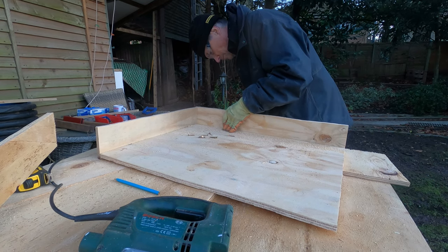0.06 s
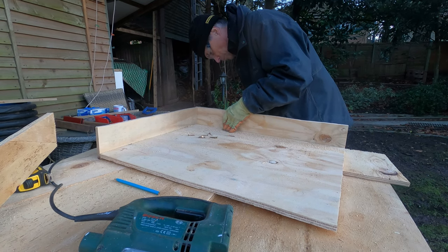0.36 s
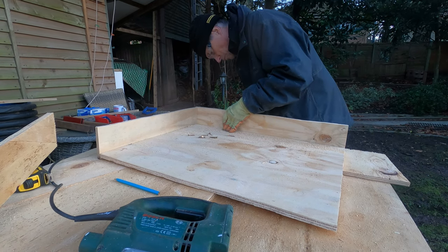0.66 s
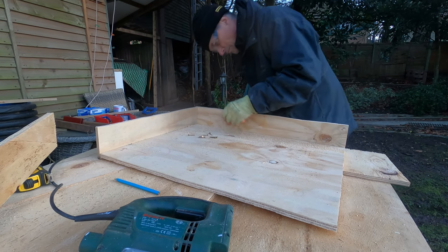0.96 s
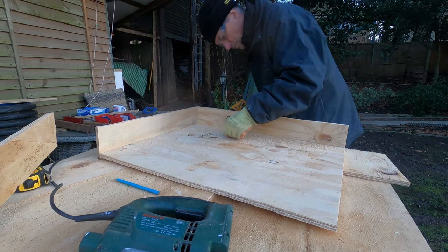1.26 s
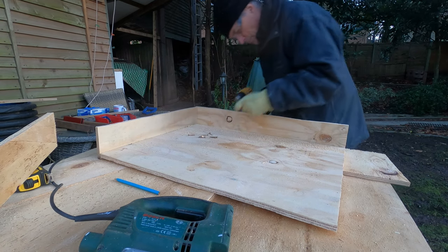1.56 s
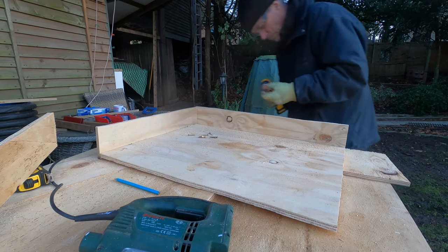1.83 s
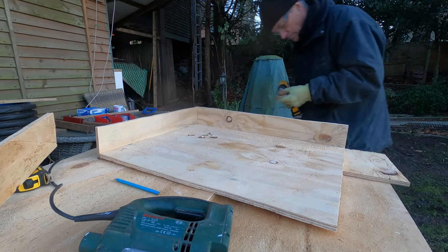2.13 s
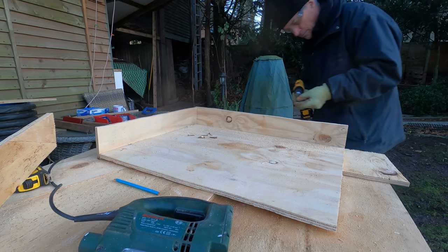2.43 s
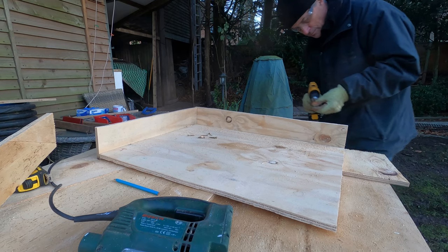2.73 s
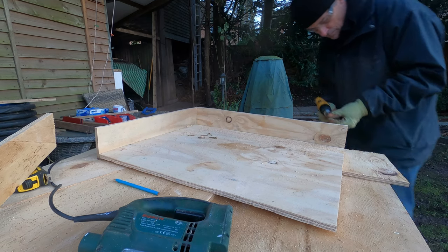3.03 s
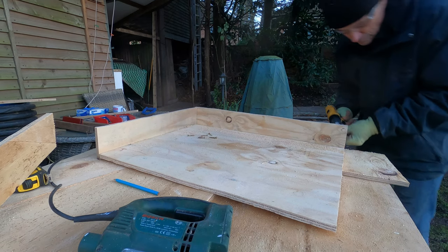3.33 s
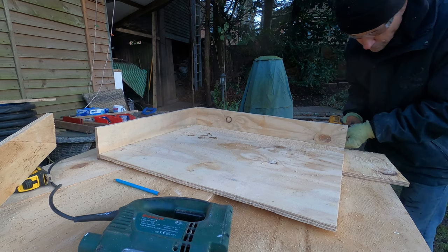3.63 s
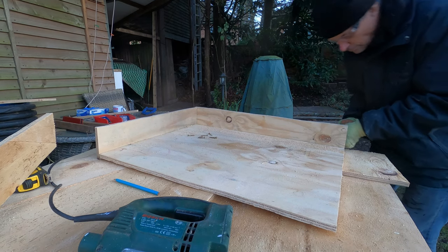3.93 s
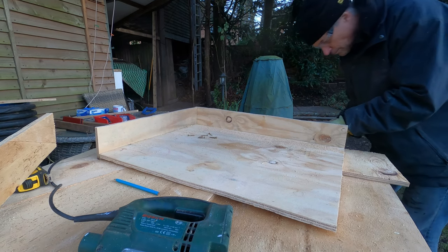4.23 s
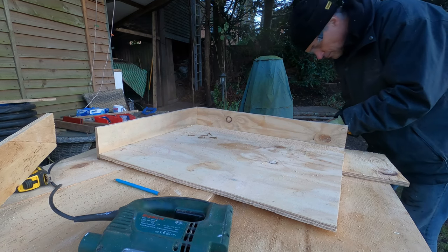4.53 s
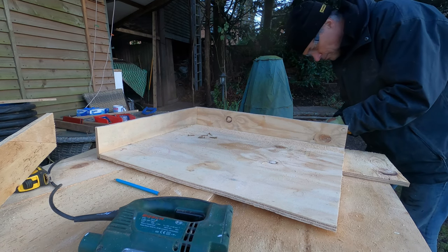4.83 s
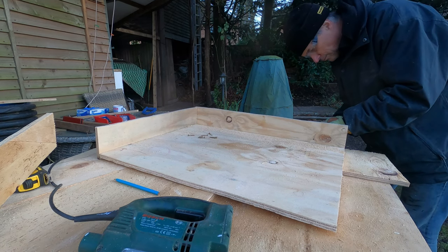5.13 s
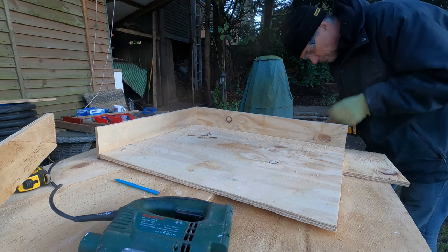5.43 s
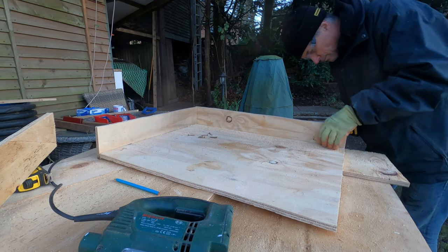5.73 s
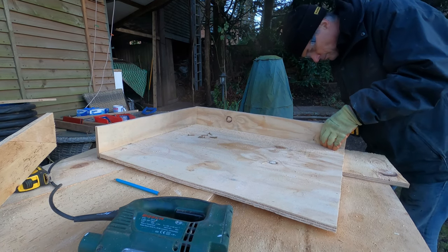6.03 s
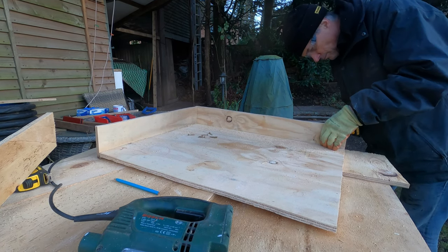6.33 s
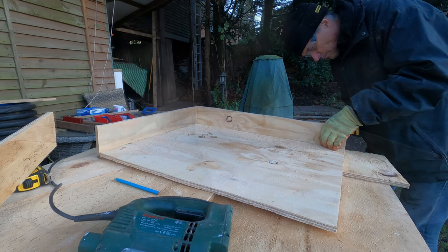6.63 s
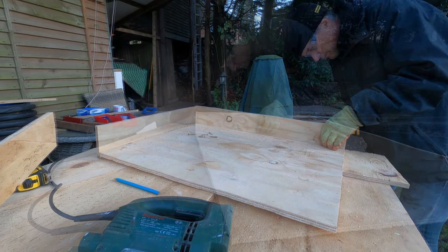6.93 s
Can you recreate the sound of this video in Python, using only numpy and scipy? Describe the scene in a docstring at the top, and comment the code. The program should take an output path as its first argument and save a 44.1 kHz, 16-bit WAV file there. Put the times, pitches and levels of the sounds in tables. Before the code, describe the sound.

A cordless drill is already running close to a stereo microphone in a garden, driving a screw into a plywood box with a hum, whine and rattle of gears. From about 0.4 seconds the screw squeals and the wood creaks as the motor slows, stopping before 0.9 seconds. Sharp knocks on wood and soft thumps follow until about 1.6 seconds. Two light metal ticks come at around 2.4 and 2.9 seconds, and a nylon coat rustles softly, mostly between 3.3 and 5.6 seconds. There is a knock at 5.4 seconds, then a cluster of knocks with a low bench thump near 5.9. At 6.5 seconds the drill spins up again, higher and running freely to the end. Farther back and to the left, a songbird whistles, chips and trills from about 1 to 6 seconds. Distant traffic hums faintly throughout.

```python
"""Cordless drill in a garden

Close to a stereo microphone, a drill drives a screw into a plywood box: the shaft hums, the gears whine
and rattle, the thread squeals, and the motor slows under the load until it stops. The bit slips off,
a coat rustles, the drill knocks down on the bench, and the motor spins up again, running light.
Farther back a songbird whistles and trills in the trees, over the hum of distant roads."""
import sys
import numpy as np
from scipy import signal
from scipy.fft import rfft, irfft, next_fast_len
from scipy.io import wavfile
from scipy.ndimage import uniform_filter1d, map_coordinates

SR = 44100
rng = np.random.default_rng(int(sys.argv[2]) if len(sys.argv) > 2 else 0)


def to_wav(sig):
    """Store sig (one row per channel, or 1-D mono) as 16-bit WAV at the path in sys.argv[1].

    Samples outside -1..1 are clipped; the rate is SR.
    """
    pcm = np.clip(np.atleast_2d(sig), -1, 1) * 32767
    pcm = np.round(pcm).astype(np.int16)
    wavfile.write(sys.argv[1], SR, pcm.T)  # frames by channels


N = 307818
TIME = np.arange(N) / SR


def undb(db):
    """Decibels to gain."""
    return 10 ** (np.asarray(db) / 20)


def unit(x):
    """Scale to rms 1."""
    return x / np.sqrt(np.mean(x ** 2))


def curves(rows):
    """Each column after a table's time column, as a value per sample."""
    times, *columns = np.transpose(rows)
    return [np.interp(TIME, times, column) for column in columns]


def ramp(start_s, length_s):
    """Rises from 0 to 1 over a stretch of time."""
    return np.clip((TIME - start_s) / length_s, 0, 1)


def bell(x, centre, width):
    """A smooth hump of height 1."""
    return np.exp(-((x - centre) / width) ** 2)


def gains(points, size):
    """A (frequency [Hz], level [dB]) table as a gain per frequency bin."""
    hz, db = np.transpose(points)
    return undb(np.interp(np.log(np.fft.rfftfreq(size, 1 / SR) + 1), np.log(hz), db))


def colour(x, points):
    """Filter a sound by a (frequency [Hz], level [dB]) table."""
    size = next_fast_len(len(x) + 4096)
    return irfft(rfft(x, size) * gains(points, size), size)[:len(x)]


def drift(rate_hz):
    """Smooth random wander of rms 1."""
    hold = max(int(SR / rate_hz), 1)
    steps = np.repeat(rng.standard_normal(N // hold + 1), hold)
    return unit(uniform_filter1d(uniform_filter1d(steps, hold), hold)[:N])


def add(track, s, sound):
    """Mix a sound into a track at time s."""
    i = int(s * SR)
    track[i:i + len(sound)] += sound[:N - i]


def ring(modes, t):
    """Decaying modes after a blow; each blow weights them a little differently."""
    return sum(undb(db + rng.normal()) * rng.choice([-1, 1])
               * np.sin(2 * np.pi * hz * t) * undb(-60 * t / t60) for hz, db, t60 in modes)


def echo(x, t60, onset_s):
    """Scatter from fence, shed and trees: a dense tail of unit energy."""
    t = TIME[:SR]
    tail = rng.standard_normal(SR) * undb(-60 * t / t60) * (1 - np.exp(-t / onset_s))
    return signal.fftconvolve(x, tail / np.linalg.norm(tail))[:N]


# Stereo width at the microphone, as the gain of the side signal: (frequency [Hz], level [dB])
MIC_WIDTH = [(100, -24), (500, -11.5), (1200, -12), (2700, -5.5), (4700, 0.5), (8000, 2)]


def place(x, pan, echo_db, t60=0.18, direct=0.95, stray=0):
    """Set a source in the garden: the right channel leads; reflections and stray sound widen the treble."""
    size = next_fast_len(N)
    quarter_cycle_lag = irfft(-1j * rfft(x, size) * gains([(2800, 0), (6000, -6)], size), size)[:N]
    scatter = colour((1 - direct) * echo(x, t60=0.092, onset_s=0.001) + stray, [(2800, 0), (6000, 2)])
    side = colour(direct * quarter_cycle_lag + scatter, MIC_WIDTH)
    channels = []
    for sign in (1, -1):
        channel = x + sign * side + undb(echo_db) * echo(x, t60, onset_s=0.0038)
        channels.append(colour(channel, [(hz, sign * db / 2) for hz, db in pan]))
    return np.array(channels)


# Traffic and air, far beyond the garden: (frequency [Hz], level [dB])
ROAD_SPECTRUM = [(12, -49), (20, -2), (53, 0), (140, -8.5), (305, -14), (540, -20.5), (1050, -15.5),
                 (1900, -29), (2400, -36), (3200, -34.5), (5000, -37), (8000, -52.5), (15000, -116)]


def roads(level_db, width):
    """Distant traffic: alike in both channels in the bass, wide in the treble."""
    mid, side = (colour(rng.standard_normal(N), ROAD_SPECTRUM) for _ in range(2))
    mid *= undb(1.2 * drift(9))
    side = width * colour(side, MIC_WIDTH)
    return np.array([mid + side, mid - side]) / np.std(mid) * undb(level_db)


# Whistles: (time [s], length [s], start pitch [Hz], end pitch [Hz], level [dB])
BIRD_WHISTLES = [(1.06, 0.099, 3020, 3060, -53), (1.133, 0.046, 3940, 3930, -40.5),
                 (1.143, 0.088, 3390, 3420, -49), (1.192, 0.051, 4200, 4130, -41),
                 (1.244, 0.024, 5020, 5160, -45), (1.333, 0.09, 3925, 3870, -39.5),
                 (1.47, 0.134, 3660, 3825, -46.5), (2.324, .1, 3730, 3803, -41.5),
                 (2.425, 0.076, 3830, 3870, -41), (2.465, 0.089, 4200, 4293, -42),
                 (2.521, 0.092, 3400, 3090, -43.5), (2.633, 0.09, 3190, 3040, -41.5),
                 (3.883, 0.028, 4400, 4450, -33), (3.932, 0.18, 4480, 4330, -43.5),
                 (4.136, 0.0294, 4150, 4334, -34), (4.174, 0.094, 4320, 4230, -43),
                 (4.337, .08, 3490, 3430, -39.5), (4.877, 0.069, 7150, 7310, -53.5),
                 (4.986, .16, 7600, 7750, -60.5), (5.17, 0.018, 2830, 2870, -42),
                 (5.196, 0.097, 3620, 3456, -44), (5.281, 0.064, 2840, 2822, -40)]
# Pulsed, rasping trills: (time [s], length [s], pitch [Hz], level [dB])
BIRD_TRILLS = [(3.571, 0.077, 4020, -45), (3.72, 0.156, 3890, -45.5), (4.406, 0.21, 4030, -45.5),
               (4.598, 0.6, 3774, -54), (6.039, 0.13, 3950, -40.5)]
# Quick upward chips: (time [s], level [dB])
BIRD_CHIPS = [(1.394, -47.5), (3.007, -41), (3.306, -40.5), (3.577, -36.5), (3.786, -38.5), (5.685, -38.5)]
# Thin falling notes: (time [s], level [dB])
BIRD_THIN_NOTES = [(1.949, -58.5), (4.42, -57), (5.629, -49.5)]
# Soft twitter: (time [s], length [s], centre pitch [Hz], level [dB])
BIRD_TWITTER = [(4.541, 0.45, 6640, -53)]
# The bird sits mostly left of the microphone: (frequency [Hz], left minus right [dB])
BIRD_BALANCE = [(4500, 7), (7500, -1)]


def bird(gain_db, edge_s=0.011, pulse_hz=65.6):
    """A songbird back in the trees: gliding tones that ring on among the trunks."""
    song = np.zeros(N)
    rasp, bend_hz = drift(802.3), 28 * drift(40)

    def note(s, length, start_hz, end_hz, db, rasp_hz, pulse_depth=0):
        """One glide, with a slight bend and a rasp on its pitch; a trill also pulses."""
        start, n = int(s * SR), int(length * SR)
        hz = np.linspace(start_hz, end_hz, n) + rasp_hz * rasp[start:][:n] + bend_hz[start:][:n]
        pulse = 1 + pulse_depth * np.sin(2 * np.pi * pulse_hz * TIME[:n])
        envelope = signal.windows.tukey(n, 2 * edge_s / length) * pulse
        add(song, s, undb(db) * envelope * np.sin(2 * np.pi * np.cumsum(hz) / SR))

    for whistle in BIRD_WHISTLES:
        note(*whistle, rasp_hz=40)
    for s, length, hz, db in BIRD_TRILLS:
        note(s, length, hz, hz, db, rasp_hz=269, pulse_depth=0.52)
    for s, db in BIRD_CHIPS:
        note(s, length=0.048, start_hz=6100, end_hz=7650, db=db, rasp_hz=330)
    for s, db in BIRD_THIN_NOTES:
        note(s, length=0.25, start_hz=7900, end_hz=6900, db=db, rasp_hz=190)
    for s, span, centre_hz, db in BIRD_TWITTER:
        pitches = centre_hz * (1 + 0.18 * rng.uniform(-1.2, 1, size=20))
        for k, hz in enumerate(pitches):
            note(s + span * k / len(pitches), length=0.036, start_hz=hz, end_hz=hz, db=db, rasp_hz=232)
    return undb(gain_db) * place(song, BIRD_BALANCE, echo_db=3, t60=0.82)


# Arm movements beside the bench: (peak time [s], half length [s], level [dB])
ARM_MOVES = [(0.885, 0.31, -52.5), (1.467, 0.098, -46.5), (3.456, 0.24, -44.5), (3.926, .12, -44),
             (4.2, 0.15, -46), (5.495, 0.13, -40), (6.063, 0.061, -48.5)]
# Hiss of the coat's nylon: (frequency [Hz], level [dB])
NYLON_SPECTRUM = [(200, 8.5), (700, 1), (2600, -0.5), (4000, -0.5), (6000, -9), (8000, -14.5), (11000, -24),
                  (15000, -35)]


def coat(grain_db, rest_db):
    """Nylon rubbing on itself: a grainy hiss that swells with each arm movement."""
    motion = undb(rest_db) + sum(undb(db) * bell(TIME, s, length) for s, length, db in ARM_MOVES)
    rub = rng.standard_normal(N) * undb(grain_db * drift(900) + 1.55 * drift(25.43))
    return unit(colour(rub, NYLON_SPECTRUM)) * motion


# Weight landing on the boards or coming off them: (time [s], level [dB])
BOARD_THUMPS = [(0.815, -40.5), (1.599, -43), (5.834, -33), (5.886, -28.5)]
# Low modes of the box and bench: (frequency [Hz], level [dB], t60 [s])
BOARD_MODES = [(51.5, 1.5, 0.22), (95, 2, 0.16), (121, 0.5, 0.084), (172, 0.5, 0.22), (282, -9.5, 0.11),
               (391, -7, 0.048)]


def thumps(rock_s, rise_db):
    """The plywood and the bench boom as weight rocks on them: three blows, growing slightly."""
    booms = np.zeros(N)
    for s, db in BOARD_THUMPS:
        for k in range(3):
            add(booms, s + k * rock_s, undb(db + k * rise_db) * ring(BOARD_MODES, TIME[:SR // 2]))
    return booms


# Bit, screw and drill body on the wood: (time [s], level [dB], scrape time [s], brightness [dB])
WOOD_KNOCKS = [(0.907, -30.5, 0.00033, 3), (0.985, -25, 0.0024, 8), (0.9955, -27, 0.0002, 2),
               (1.0, -24, 0.0019, 3), (1.007, -39, 0.00035, -3), (1.3215, -31.5, 0.0003, 5),
               (1.387, -23.5, 0.0027, 5), (1.392, -19, 0.0078, 5.5), (1.4085, -15.5, 0.00028, 3),
               (5.39, -26, 0.0058, -1), (5.8115, -26, 0.002, 5), (5.834, -25, 0.002, 1),
               (5.872, -20, 0.007, 1), (5.8855, -19, 0.00019, 9), (5.889, -13.5, 0.0065, 0),
               (5.919, -22, 0.0043, -10)]
# Light metal ticks as the next screw is fitted: (time [s], level [dB])
SCREW_TICKS = [(2.367, -40.5), (2.857, -32)]
# Crack of a hard contact on wood: (frequency [Hz], level [dB])
CRACK_SPECTRUM = [(150, 2), (550, -1), (900, -13), (1300, 10), (2000, 4), (2800, 7), (3900, 5), (5000, -7),
                  (7200, -17.5), (10000, -25), (15000, -48)]
# Modes of the drill's plastic casing: (frequency [Hz], level [dB], t60 [s])
CASING_MODES = [(1410, -5, 0.048), (1960, -10, 0.051), (2615, 6, 0.027), (2910, 3, .02), (3680, -10, 0.026)]


def knocks(gain_db, casing_db, impact_db, crack_s=0.0017, attack_s=0.00071):
    """Each contact at the bench is an impact and a scrape of tiny slips that ring casing and wood."""
    track, t = np.zeros(N), TIME[:4096]
    tick_scrape_s, tick_bright_db = 0.00075, 15
    ticks = [(s, db, tick_scrape_s, tick_bright_db) for s, db in SCREW_TICKS]
    for s, db, scrape_s, bright_db in WOOD_KNOCKS + ticks:
        force = rng.standard_normal(len(t)) * bell(t, 0, 2 * scrape_s) * (1 - np.exp(-t / attack_s))
        force[0] = undb(impact_db)
        crack = colour(rng.standard_normal(len(t)) * np.exp(-t / crack_s), CRACK_SPECTRUM)
        response = unit(crack) + undb(casing_db) * unit(ring(CASING_MODES, t))
        hit = signal.fftconvolve(force, response)[:len(t)]
        # soft wood rounds off the very top
        tilt = [(750, -bright_db), (7500, 1.4 * bright_db),
                (10000, bright_db - 4), (14000, bright_db - 10)]
        add(track, s, undb(db + gain_db) * unit(colour(hit, tilt)))
    return track


# Plywood creaks as the screw tightens, and the gears' jolt as the drill restarts:
# (peak time [s], half length [s], level [dB])
CREAKS_AND_JOLT = [(0.521, 0.019, -27), (0.683, 0.028, -29), (0.766, 0.031, -40), (6.588, 0.017, -35)]


def creaks_and_jolt(centre_hz):
    """Short bursts in one narrow band: tiny slips in the plywood, then gear backlash at the restart."""
    bursts = sum(undb(db) * bell(TIME, s, length) for s, length, db in CREAKS_AND_JOLT)
    band = [(centre_hz / 4, -86), (centre_hz, 0), (centre_hz * 4, -86)]
    return bursts * unit(colour(rng.standard_normal(N), band))


# The screw tightening in the box: (time [s], pitch [Hz], level [dB])
SCREW_SQUEAL = [(.36, 4100, -50), (.435, 3890, -34), (.5, 3960, -38), (.665, 3924, -29.5),
                (.725, 3780, -30), (.775, 3020, -33), (.8, 2870, -61)]


def screw(rasp_hz, catch_db):
    """The thread sticks and slips in the wood: a rough squeal that sags as the screw stalls."""
    hz, level_db = curves(SCREW_SQUEAL)
    phase = 2 * np.pi * np.cumsum(hz + rasp_hz * drift(700)) / SR
    turning = (TIME > SCREW_SQUEAL[0][0]) & (TIME < SCREW_SQUEAL[-1][0])
    return turning * undb(level_db - catch_db * drift(96.87)) * np.sin(phase)


def motor_and_gears(hz, shaft, teeth, body, rattle_db, shaft_db, whine_db, growl_db,
                    throb, waver_db, flutter, treble_db_per_octave, radiate_hz, grit_db=0):
    """Shaft hum, tooth whine, low growl and rattle; also returns the rattle that leaves the far side."""
    turns = np.cumsum(hz * (1 + flutter * drift(120))) / SR
    running, speed = hz > 70, hz / hz.max()
    growl_order = 0.755  # cycles per motor turn
    # the gears bind and free unevenly, and throb with the growl
    surge = undb(0.57 * drift(150)) * (1 + throb * np.cos(2 * np.pi * growl_order * turns))

    def rattle(points_per_turn=160, repeat=0.27):
        """The teeth clatter in a pattern that partly repeats from one turn to the next."""
        pattern = signal.lfilter([1], [1, -repeat], rng.standard_normal((1024, points_per_turn)), axis=0)
        impacts = map_coordinates(pattern.ravel(), [turns * points_per_turn], order=3)
        clatter = colour(running * surge * impacts, body)
        return running * undb(rattle_db) * clatter / np.std(clatter[running])

    def tone(order, db, slip=0):
        """One wavering multiple of the shaft speed; the small housing radiates low ones poorly."""
        radiated = np.minimum(order * hz / radiate_hz, 1) ** 6
        amplitude = running * radiated * np.sqrt(2) * undb(db + waver_db * drift(35))
        return amplitude * np.sin(2 * np.pi * (order * turns + rng.random()) + slip)

    hum = sum(tone(order, shaft_db + db) for order, db in shaft)
    growl = tone(growl_order, growl_db)
    # backlash roughens the whine as the motor labours below its top speed
    backlash = np.clip(0.15 + 1.5 * (1 - speed), 0, 0.45) * drift(330)
    whine = sum(tone(order, whine_db + db, backlash) for order, db in teeth)
    gears = rattle()
    low = colour(gears, [(2000, 0), (3000, -40)])
    treble_db = treble_db_per_octave * np.log2(np.maximum(speed, 0.1))  # brighter with speed
    high = (gears - low) * undb(grit_db * drift(1500) + treble_db)
    grind = low * undb(1.6 * drift(55)) + high * undb(0.9 * drift(55))  # each band wavers on its own
    return hum + growl + whine + grind, rattle()


# Shaft tones, running light: (multiple of motor speed, level [dB])
LIGHT_SHAFT = [(1, 1), (3, 0), (4, -8)]
# Gear rattle, running light: (frequency [Hz], level [dB])
LIGHT_RATTLE = [(60, -3), (180, 0.5), (400, -2.5), (850, 5), (1150, 3.5), (1450, -1), (2100, -1.5),
                (2550, 4), (3600, -4.5), (4600, -7), (5700, -3), (7200, -8), (9000, -18), (15000, -31)]
# The free-running drill at the microphone: (frequency [Hz], left minus right [dB])
LIGHT_BALANCE = [(100, 3), (800, -4.5), (2700, 0), (4700, -0.5), (8000, -6.5)]


def drill_spinning_up(trigger_s, top_hz, time_constant_s):
    """Close by, unloaded: the gears rattle first, the hum peaks as speed builds, the whine comes last."""
    torque = np.exp(-np.maximum(TIME - trigger_s, 0) / time_constant_s)
    hz = top_hz * (1 - torque)
    rattle_in_db, hum_in_db, whine_in_db = (-40 * (1 - ramp(trigger_s, s)) for s in (0.058, 0.072, 0.09))
    mesh_order = 12
    casing_db = 8.5 * bell(mesh_order * hz, centre=2570, width=70)  # the whine crosses a resonance
    drill, far_side = motor_and_gears(
        hz, LIGHT_SHAFT, teeth=[(mesh_order, -1)], body=LIGHT_RATTLE,
        rattle_db=-31 + rattle_in_db, shaft_db=-39 + 22.5 * torque + hum_in_db,
        whine_db=-30.5 + casing_db + whine_in_db, growl_db=-57 + hum_in_db,
        throb=0.059, waver_db=3, flutter=0.0024, treble_db_per_octave=8, radiate_hz=265, grit_db=1.5)
    return place(drill, LIGHT_BALANCE, echo_db=-10.5, stray=0.7 * far_side)


# The motor sagging under the load, then braking: (time [s], speed [Hz])
LOADED_SPEED = [(0, 228), (.11, 224.6), (.22, 221), (.245, 217), (.34, 216), (.47, 203.5), (.56, 193.6),
                (.66, 179), (.71, 173.8), (.76, 156.2), (.85, 118.6), (.9, 55)]
# Shaft tones under load: (multiple of motor speed, level [dB])
LOADED_SHAFT = [(1, 1), (3, -7.5), (6, -12), (19, -16)]
# Gear rattle, pressed against the plywood: (frequency [Hz], level [dB])
LOADED_RATTLE = [(60, -24), (160, 13), (330, -0.5), (520, 3), (800, -1), (1250, 2), (2500, 2.5), (3100, 0),
                 (4050, 1.5), (4430, -8), (4950, -2), (5700, -9.5), (7300, -13.5), (9500, -24.5),
                 (15000, -39.5)]
# Drill and box at the microphone: (frequency [Hz], left minus right [dB])
LOADED_BALANCE = [(100, -0.5), (800, -3.5), (2700, 0.5), (4700, 2), (8000, -2.5)]


def drill_driving_screw(bite_s, release_s):
    """Close by, on the box: the growl swells at the bite, the wood squeals, the gears slacken on release."""
    hz, = curves(LOADED_SPEED)
    teeth = [(10.8, 1), (12, -8), (21.6, -15)]  # (multiple of motor speed, level [dB])
    load = ramp(bite_s - 0.02, 0.02)
    coast_s = np.maximum(TIME - release_s, 0)
    slack_db, growl_fade_db = -382 * coast_s, -192 * coast_s
    casing_db = 11 * bell(teeth[0][0] * hz, centre=2274, width=172)  # the whine crosses a resonance
    strain_db = 13 * (1 - hz / hz.max())  # the teeth press harder as the motor is dragged down
    drill, far_side = motor_and_gears(
        hz, LOADED_SHAFT, teeth, body=LOADED_RATTLE,
        rattle_db=-25 + slack_db, shaft_db=-27.5 - 3 * load + slack_db,
        whine_db=-36.5 + casing_db + strain_db + slack_db, growl_db=-37.5 + 12.5 * load + growl_fade_db,
        throb=0.15, waver_db=2.26, flutter=0.0019, treble_db_per_octave=3, radiate_hz=102)
    rasps = screw(rasp_hz=151.3, catch_db=3.5) + creaks_and_jolt(centre_hz=1156)
    return place(drill + rasps, LOADED_BALANCE, echo_db=-20, direct=0.68, stray=0.5 * far_side)


def scene():
    """Two runs of the drill and the handling between them up close, the bird and the roads behind."""
    driving = drill_driving_screw(bite_s=0.357, release_s=0.773)
    spinning = drill_spinning_up(trigger_s=6.54, top_hz=271.1, time_constant_s=0.066)
    handling = (knocks(gain_db=-20, casing_db=-5.5, impact_db=13)
                + thumps(rock_s=0.027, rise_db=0.5)
                + coat(grain_db=1.5, rest_db=-62))
    bench = place(handling, pan=[(1000, -2.5), (3500, 0.5), (8000, -10)], echo_db=-6)
    return roads(level_db=-42, width=1.74) + bird(gain_db=-3.5) + bench + spinning + driving


def record(dry, top_hz=15600):
    """A steep low-pass removes the highest treble."""
    return signal.sosfilt(signal.ellip(8, 0.2, 70, top_hz, fs=SR, output="sos"), dry)


dry = scene()
out = record(dry)
to_wav(out)
```